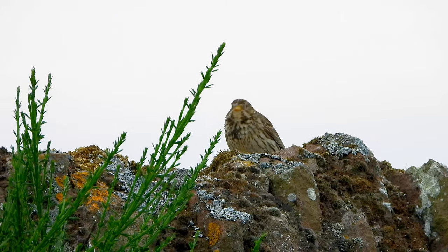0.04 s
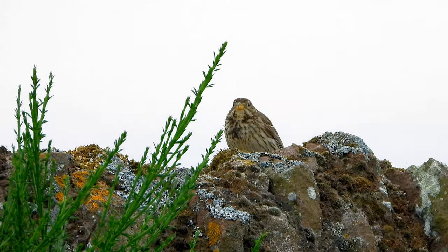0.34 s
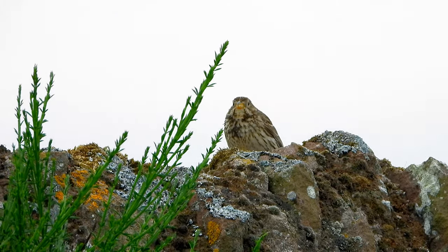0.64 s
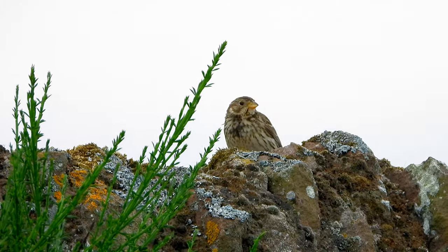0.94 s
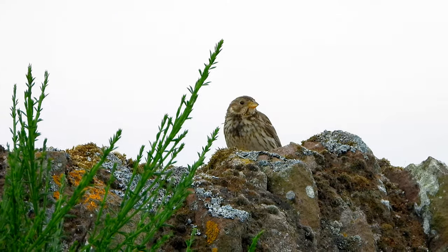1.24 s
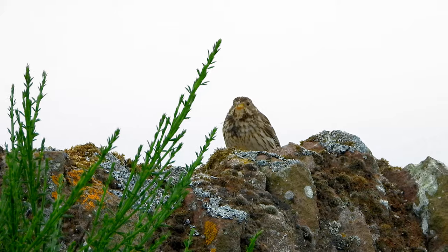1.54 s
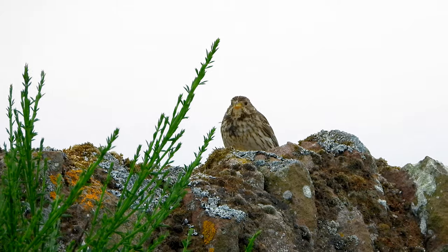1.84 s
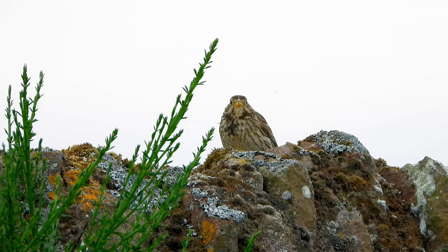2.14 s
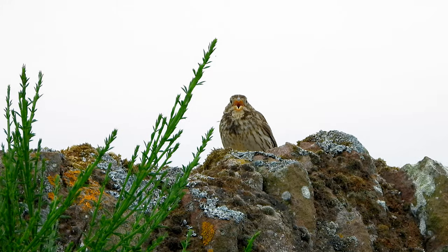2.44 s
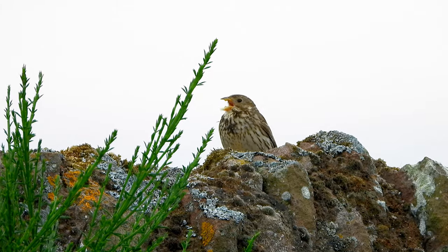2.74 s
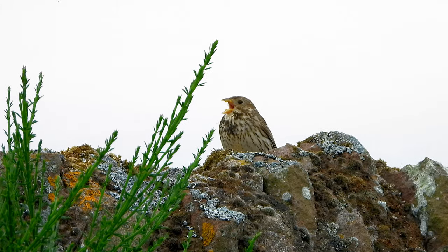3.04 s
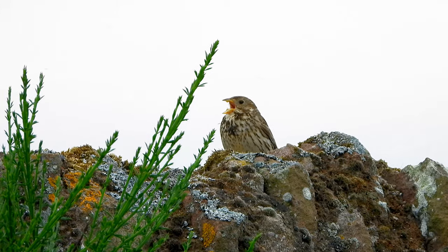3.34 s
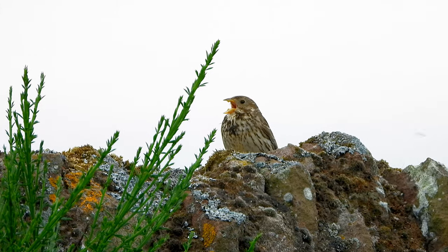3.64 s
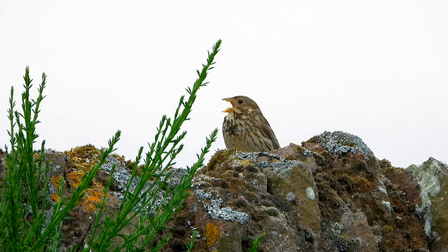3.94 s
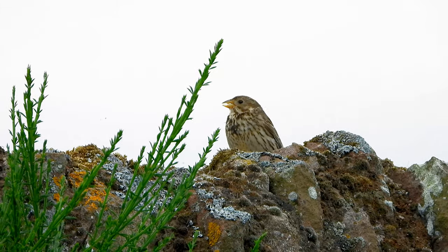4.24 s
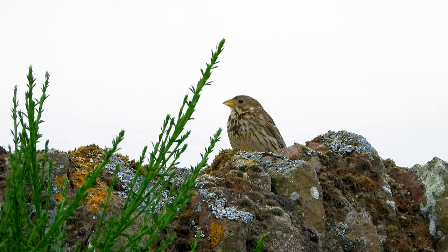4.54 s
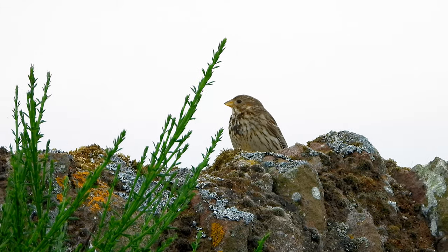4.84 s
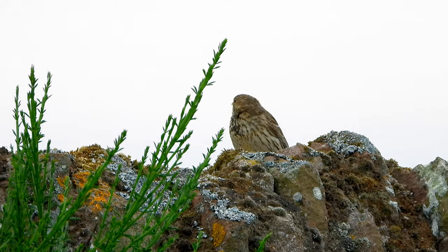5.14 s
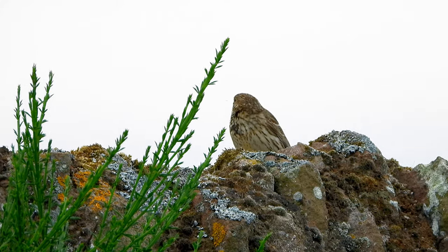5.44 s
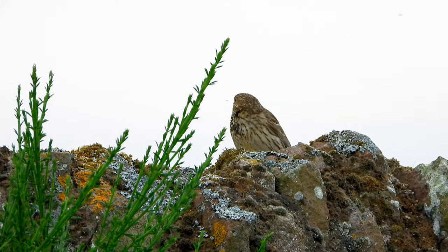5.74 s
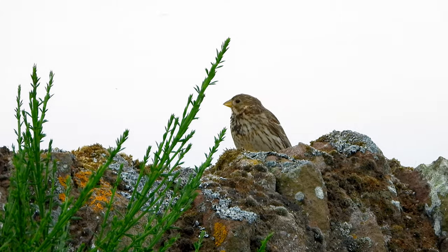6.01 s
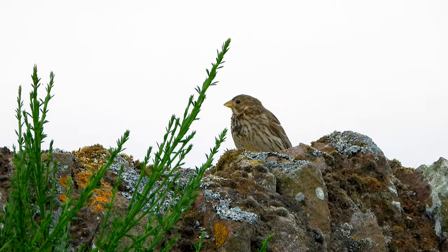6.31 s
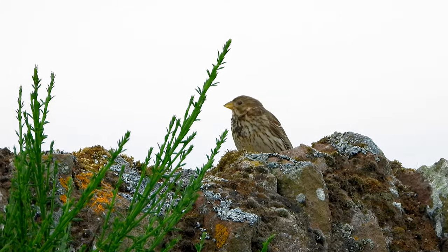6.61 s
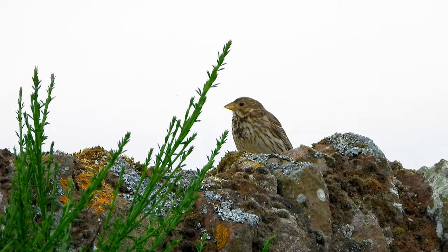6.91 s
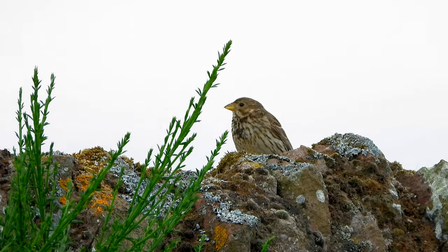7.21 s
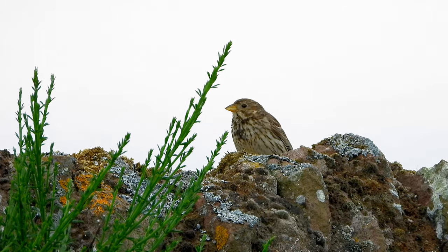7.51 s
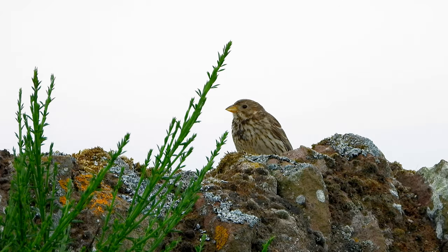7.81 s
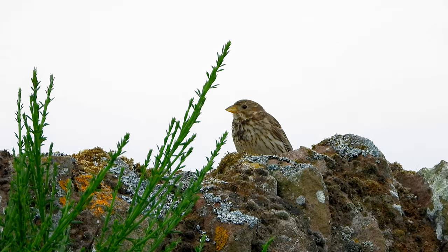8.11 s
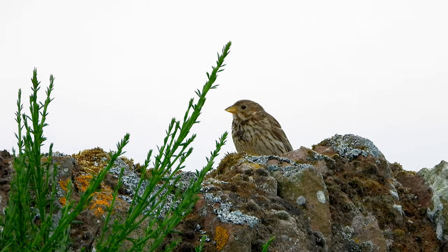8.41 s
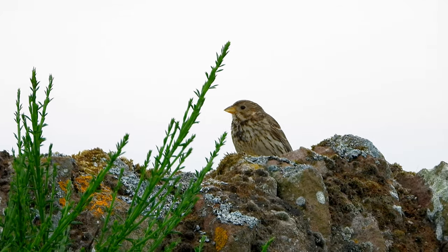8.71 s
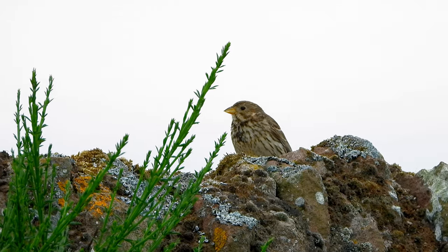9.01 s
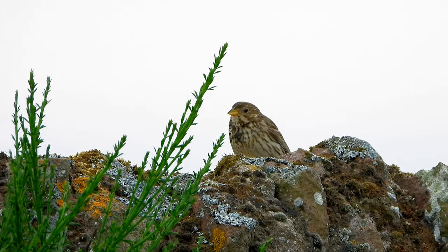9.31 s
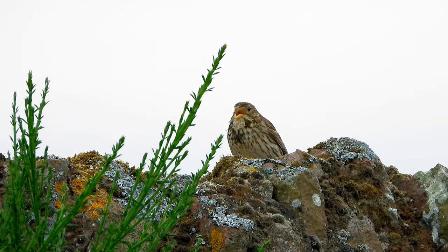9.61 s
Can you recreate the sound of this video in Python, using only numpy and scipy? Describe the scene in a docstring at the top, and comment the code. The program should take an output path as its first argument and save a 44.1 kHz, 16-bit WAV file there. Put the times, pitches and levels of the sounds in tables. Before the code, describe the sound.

A few climbing, buzzy whistles sound at middle distance in quiet countryside. Then a songbird perched near the microphone sings once: ticks first, then buzzes, then fast metallic rattles and trills that thin out. Other birds keep whistling and twittering farther off with a slight echo, over soft wind and occasional low puffs on the microphone. Two faint, dull knocks come late, and the near bird ticks again.

```python
"""Open fields, by a stone wall. A corn bunting close by sings one jangling strophe: ticks, buzzes, then a
rush of trills; a few more ticks follow later. The two sides of its syrinx are independent oscillators that
whistle at once and beat against each other. Other birds whistle and chatter farther off, the far ones
with more echo. The air murmurs, light gusts brush the microphone and two soft knocks sound."""
import sys
import numpy as np
from scipy import signal
from scipy.fft import rfft, irfft
from scipy.io import wavfile
from scipy.ndimage import uniform_filter1d

SR = 44100
rng = np.random.default_rng(int(sys.argv[2]) if len(sys.argv) > 2 else 0)


def to_wav(sig):
    """Store sig (one row per channel, or 1-D mono) as 16-bit WAV at the path in sys.argv[1].

    Samples outside -1..1 are clipped; the rate is SR.
    """
    pcm = np.clip(np.atleast_2d(sig), -1, 1) * 32767
    pcm = np.round(pcm).astype(np.int16)
    wavfile.write(sys.argv[1], SR, pcm.T)  # frames by channels


N = 434826
TIME = np.arange(N) / SR
FREQS = np.fft.rfftfreq(N, 1 / SR)

# The bunting's note shapes. Each: pitches in Hz from start to end, then the crest's place from 0 to 1.
CHIP, SQUEAK, DIP = (4300, 6600, 7100, 6900, .45), (970, 2260, 2570, 2500, 0.56), (8200, 7650, 7750, 7900, .3)
BUZZ_LOW, BUZZ_HIGH, HELD = (4330, 4510, 4590, 4530, .6), (7850, 8200, 8480, 8500, .25), (4150, 4420, 4620, 4600, .7)
FLICK, RATTLE_ARCH, ARCH = (4300, 6100, 7300, 8000, .48), (4750, 5100, 5560, 5300, .66), (4750, 5330, 5380, 4950, .52)
CHORD_LOW, CHORD_HIGH, SWELL = (5150, 5540, 5680, 5520, .2), (6150, 6950, 7330, 7480, .62), (5150, 5270, 5290, 5180, 0.56)
JANGLE_LOW, JANGLE_HIGH = (5550, 5570, 5430, 5150, .76), (8000, 7450, 7900, 7850, 7200, .25)
WARBLE_LOW, WARBLE_HIGH = (4550, 4480, 4720, 5100, .66), (6600, 5520, 5480, 5520, .72)
HOOK, DROP = (5480, 5700, 5520, 4750, .8), (8350, 7750, 7200, 5500, .72)
# The three notes of a tick. Each row: offset in seconds, length in seconds, four pitches in Hz, crest 0-1.
TICK_NOTES = [(-.048, 0.024, 5180, 4530, 4313, 4260, 0.46), (-.020, 0.0197, 2530, 3020, 3340, 3370, 0.39),
              (0, .024, 5450, 5700, 5150, 4830, .58)]
# Ticks. Each row: start of the main note in seconds, level in dB of each of the three notes.
TICKS = [(2.21, -55, -55, -32), (2.494, -34.5, -35.5, -19), (2.680, -28.5, -33.5, -17),
         (9.396, -67, -55, -32), (9.7, -36, -37.5, -20), (9.894, -33, -37, -12)]
# Opening syllables. Each entry: start in seconds.
OPENING_S = [2.777, 2.885, 2.9866, 3.0896]
# Single notes of three shapes. Each row: start and length in seconds, pitch in Hz, level in dB.
HELD_NOTES, HOOKS, DROPS = [(3.112, 0.06, 4490, -22.5), (3.169, 0.07, 4450, -25),
                            (3.229, 0.039, 4400, -35.5)], [(4.118, 0.027, 5580, -22), (4.16, 0.019, 5600, -19),
                                                (4.198, 0.022, 5660, -20), (4.249, 0.033, 4710, -26.5),
                                                (4.307, 0.03, 5460, -26.5)], [(4.155, 0.004, 6900, -22),
                                                               (4.1926, 0.0048, 7150, -27),
                                                               (4.369, 0.0091, 7500, -32),
                                                               (4.416, 0.01, 7420, -30),
                                                               (4.461, 0.012, 7200, -31),
                                                               (4.512, 0.013, 7310, -33.5)]
# Lone upward flicks. Each row: start in seconds, level in dB.
FLICKS = [(3.272, -21), (3.2933, -23), (3.388, -25)]
# Swelling rattles. Each row: start in seconds, repeats, period in seconds, first and last level in dB.
RATTLES = [(3.301, 6, .0085, -26, -18.5), (3.509, 4, .0082, -26, -15.5)]
# Arches that end the rattles. Each row: start in seconds, pitch in Hz, level in dB.
ARCHES = [(3.352, 5220, -16.5), (3.367, 5150, -19.5), (3.541, 5310, -16.5)]
# Two-voiced chords. Each row: start and length in seconds, lower voice's pitch in Hz and level in dB.
CHORDS = [(3.397, 0.033, 5620, -23.5), (3.554, 0.027, 5510, -23.5), (3.634, .028, 5440, -22.5)]
# Swells under a buzz. Each row: start and length in seconds, pitch in Hz, level in dB,
# then the buzz's first and last pitch in Hz and its level in dB.
SWELLS = [(3.466, 0.024, 5340, -21, 8100, 7600, -36), (3.616, 0.029, 5360, -19, 8200, 6400, -35.5),
          (3.692, 0.05, 5237, -16, 5840, 6500, -28.5), (3.856, 0.031, 5350, -17.5, 6400, 5750, -26.5)]
# Jangles. Each row: start in seconds, repeats, period in seconds, low pitch in Hz, first and last dB.
JANGLES = [(3.7755, 7, .0125, 5424, -26.5, -18), (3.92, 5, .0141, 5550, -26, -18)]
# Warbles. Each row: start in seconds, repeats, level in dB, delay of the upper voice in seconds.
WARBLES = [(3.9919, 6, -23, 0.018), (4.085, 3, -25, 0.003)]
# Responses of the throat, the combination tones and the rasp. Each row: frequency in Hz, gain in dB.
THROAT, COMBINATION_GAIN, RASP_SPECTRUM = [(2500, -40.5), (3400, -25), (4200, -0.5), (5000, -3.5),
                                           (7800, 2.5), (8800, -11.5), (11500, -16), (14000, -19)], [(500, -52.5), (900, -12), (1400, 9.5),
                                                           (3000, -2), (9500, -5), (10600, -17), (11700, 5),
                                                           (13100, 4.5), (14200, -10.5)], [(600, -28), (1500, 3.5),
                                                                          (7000, -9), (9500, 10),
                                                                          (11500, -1.5), (13300, -2.5),
                                                                          (14200, -16)]
# The bunting's stereo balance. Each row: frequency in Hz, pan in dB (always left minus right).
BUNTING_PAN = [(3000, 2.5), (4500, -2), (5200, 1), (6000, -2), (7500, 0), (10000, 0.5)]

# Climbing whistles at middle distance. Each row: start and length in seconds, first and last pitch in Hz,
# whistle level, buzz level and pan in dB.
RISERS = [(0.393, 0.24, 4070, 5760, -40, -43, -7.5), (0.911, 0.16, 4010, 5240, -43, -42, -3),
          (1.375, 0.221, 4140, 5490, -36.5, -37, -5.5)]
# Upstrokes of a trill at middle distance. Each row: start in seconds, pitch in Hz, level in dB.
TRILL_TICKS = [(5.918, 5400, -46), (5.9405, 5400, -42), (5.9595, 5030, -37.5), (5.978, 4850, -36.5),
               (5.9965, 4750, -36), (6.0152, 4570, -35), (6.034, 4530, -36), (6.0523, 4540, -34),
               (6.071, 4730, -35)]
# The trill's rising last note: start and length in seconds, four pitches in Hz, level in dB.
TRILL_END = (6.084, .038, 4700, 5280, 5430, 5620, -42.5)
# Far wheezes. Each row: start and length in seconds, first and last pitch in Hz, level in dB,
# flutter rate and depth in Hz, pan in dB.
FAR_WHEEZES = [ (0.202, 0.48, 4150, 3746, -53, 105.5, 80.5, 4.5),
               (1.099, 0.095, 6350, 5720, -51.5, 121, 490, -8.5),
               (1.788, 0.41, 3980, 3687, -50.5, 105.8, 75, 5.5),
               (3.038, 0.16, 3130, 2054, -55.5, 41.9, 200, 11),
               (3.384, 0.42, 4030, 3680, -46.5, 107.3, 170, 2),
               (3.68, 0.2, 2990, 3340, -48.5, 152, 223, 10), (4.58, 0.24, 4610, 4400, -52, 50, 150, -2.5),
               (4.889, 0.17, 4070, 3540, -45.5, 63.8, 157, 5.5),
               (5.286, 0.14, 3620, 3280, -52, 65.7, 39.7, 3), (5.803, 0.17, 3960, 3530, -47, 65.6, 150, 6),
               (6.973, 0.51, 4740, 3820, -49.5, 62.3, 151, -1),
               (8.552, 0.48, 4610, 3790, -49, 62.7, 150, -1)]
# Far whistles. Each row: start and length in seconds, first and last pitch in Hz, level and pan in dB.
FAR_WHISTLES = [ (0.168, 0.15, 3400, 2960, -58.5, -8), (0.448, 0.15, 3400, 2970, -58, -5),
                (0.831, 0.011, 3000, 2730, -51, -4), (0.875, 0.014, 2430, 2780, -51, 3),
                (0.894, 0.024, 3300, 3150, -44.5, 4), (0.936, 0.27, 3310, 3160, -57, 9),
                (1.098, 0.061, 3820, 3150, -47, 6), (1.192, 0.034, 5400, 4350, -35.5, -5),
                (1.269, 0.027, 5160, 4650, -44, 5), (1.283, .014, 3170, 3660, -53, 6),
                (1.307, .018, 3550, 4050, -53, 5), (1.283, 0.0847, 1732, 1570, -55, 5),
                (5.874, .24, 5050, 4060, -57, 0), (1.364, 0.017, 3860, 3480, -52, 3),
                (1.6, 0.16, 3385, 3190, -66, 8), (2.547, 0.023, 3240, 3270, -48, 21),
                (4.046, 0.023, 3360, 3130, -43, 6), (4.331, 0.041, 3150, 3520, -47, 4),
                (4.54, 0.034, 3920, 3420, -41, 4.5), (5.289, 0.089, 4850, 4340, -52.5, -2.5),
                (5.43, 0.032, 3990, 3530, -44.5, 6.5), (5.762, 0.023, 4760, 4250, -51, -2),
                (5.831, 0.0072, 5280, 4200, -38.5, -2), (5.841, 0.04, 4160, 3020, -43, 1),
                (6.207, 0.024, 4420, 3260, -41.5, -5), (6.41, 0.07, 4710, 4240, -51, 1.5),
                (8.29, 0.058, 4570, 4000, -56, 4), (9.471, 0.031, 3630, 3410, -45.5, 2),
                (7.084, 0.12, 3500, 3310, -57.5, 4), (7.637, 0.09, 3560, 3160, -55, 3),
                (7.982, 0.12, 3800, 3160, -55, -3), (9.194, 0.079, 4250, 3830, -46, -1),
                (9.721, 0.18, 2910, 2810, -58, 12)]
# Far arched whistles. Each row: start and length in seconds, level and pan in dB.
FAR_ARCHES = [(6.614, .26, -46, 7), (8.157, .255, -47, 7)]
# Contours of the far arches and chimes. Each entry: pitch in Hz, at even steps of time.
FAR_ARCH_HZ = (3170, 3490, 3370, 3230, 2880)
CHIME_HZ = (3956, 3554, 3660)
# Hoarse, very distant calls. Each row: start and length in seconds, three pitches in Hz, level in dB.
LOW_CALLS = [(0.331, 0.35, 1390, 1620, 1360, -57.5), (0.848, 0.53, 1760, 1780, 1560, -59),
             (4.28, .49, 1820, 1845, 1740, -63)]
# Far runs of pips. Each row: start in seconds, repeats, period in seconds, pitch in Hz,
# mean rise as a share of the pitch, level and pan in dB.
FAR_RUNS = [(4.29, 3, 0.019, 3440, 0.17, -39.5, 9), (4.715, 6, 0.014, 3370, -0.12, -42.5, 7),
            (5.21, 6, 0.015, 4500, -0.22, -45, -1), (5.59, 6, 0.018, 3490, -0.14, -43, 4),
            (6.075, 5, .031, 3100, -0.2, -53.5, 1), (6.155, 3, 0.019, 4350, -0.33, -37.5, -1),
            (7.374, 6, 0.019, 3090, -.2, -50.5, -4), (7.555, 4, 0.014, 2960, 0.24, -51.5, 7),
            (8.47, 7, 0.022, 3290, -0.27, -52.5, -7), (8.785, 5, 0.018, 3390, -0.19, -47.5, 4),
            (9.245, 4, 0.017, 3220, -0.23, -50.5, 0)]
# Far chiming series. Each row: start in seconds, repeats, level in dB.
FAR_CHIMES = [(6.251, 5, -44), (7.695, 7, -45.5)]

# Soft knocks near the microphone. Each row: start in seconds, peak level in dB.
KNOCKS = [(8.308, -37), (9.4, -34.5)]
# Gusts on the microphone. Each row: centre and half width in seconds, level in dB.
GUSTS = [(1.276, 0.081, -62.5), (1.464, 0.076, -43), (1.635, 0.086, -56.5), (3.441, 0.0084, -50),
         (3.667, 0.039, -61.5), (4.234, 0.011, -46.5), (4.375, 0.14, -58.5), (5.167, 0.016, -53.5),
         (5.587, 0.31, -58), (9.435, 0.013, -51)]
# Spectra of the gusts and of the murmuring air. Each row: frequency in Hz, relative level in dB.
GUST_SPECTRUM, AIR_SPECTRUM = [(25, -36), (100, -21), (160, 4), (210, 0.5), (300, -10), (1000, -32),
                               (8000, -80.5)], [(50, -43), (100, -20), (190, -6.5), (332, -3),
                                                    (556, -4.5), (859, -1), (1380, -7.5), (2000, -7),
                                                    (2350, -11.5), (4400, -16), (5300, -19.5), (6650, -26),
                                                    (8350, -38.5), (14000, -65)]
# Slow course of the murmur. Each row: time in seconds, level in dB.
AIR_LEVEL = [(0, -57.5), (2, -58.5), (4.2, -56.5), (5.8, -58), (7.6, -56.5), (8.6, -54), (9.86, -55.5)]
# Likeness of noise at the two ears. Each row: frequency in Hz, left-right correlation.
EAR_CORRELATION = [(100, 0.29), (280, 0.74), (600, 0.53), (1200, 0.61), (2500, 0.27)]


def bunting(left_lead_s=.000027, rasp_db=-31, coupling_db=-13):
    """Nonlinear coupling: the two voices modulate each other into sum and difference tones."""
    song = np.zeros((2, N))
    for phrase in (ticks, opening, rattles, chords, jangles, ending):
        for s, sound in phrase():
            add(song, s, sound)
    spectrum = rfft(song) + undb(coupling_db + at_pitch(COMBINATION_GAIN, FREQS)) * rfft(song ** 2)
    # a fine sizzle rides on the notes and bridges the gaps in the trills
    effort = uniform_filter1d(np.abs(np.diff(song[0], 2, prepend=[0, 0])), size=300)
    rasp = undb(rasp_db) * effort * noise(RASP_SPECTRUM)
    # the bird sits a little to the left, so that ear hears it first
    left_ear = undb(at_pitch(BUNTING_PAN, FREQS) / 2) * np.exp(1j * np.pi * FREQS * left_lead_s)
    return irfft(spectrum * np.array([left_ear, 1 / left_ear]), N) + rasp


def syrinx(length, pitches, crest, buzz_hz=0, depth_hz=0, choke_hz=800, octave_db=-24, close_s=0.0015):
    """One side of the syrinx as source and filter; a buzz modulates its frequency and amplitude."""
    hz, swell = gesture(length, pitches, crest, pointed=np.exp(-(length / .026) ** 2))
    n = len(hz)
    early = np.linspace(.5, -.5, n)  # the buzz slows and eases as it goes on
    cycle = turn(buzz_hz * (1 + 0.25 * early + .09 * walk(400, n)))
    swing = np.sin(cycle)
    sawtooth = swing - .3 * np.sin(2 * cycle)
    jitter = 0.0087 * (hz / 5000) * walk(880, n)  # higher notes are less steady
    phase = turn(hz * (1 + jitter) + depth_hz * sawtooth)
    pulse = np.exp((swing - 1) * (1 + early) * depth_hz / choke_hz)
    closing = np.tanh(TIME[:n][::-1] / close_s) ** 2
    # the throat passes whichever partial lies in its band: low notes sound mostly their octave
    first, second = undb(at_pitch(THROAT, hz)), undb(octave_db + at_pitch(THROAT, 2 * hz))
    tone = (first * np.sin(phase) + second * np.sin(2 * phase)) / np.hypot(first, second)
    return swell * pulse * closing * tone


def note(shape, length, db, hz=None, buzz_hz=0, depth_hz=0):
    """Transposition keeps frequency ratios: a note shape is scaled so that its middle lies at hz."""
    pitches = np.array(shape[:-1], float)
    if hz is not None:
        pitches = pitches * hz / np.mean(pitches[1:-1])
    return undb(db) * syrinx(length, pitches, shape[-1], buzz_hz, depth_hz)


def train(shape, s, repeats, period, length, first_db, last_db, hz=None, variation=.009):
    """Quasi-periodic repetition: the level ramps while pace, pitch and strength vary a little."""
    hz = np.mean(shape[1:-2]) if hz is None else hz
    for k, db in enumerate(np.linspace(first_db, last_db, repeats)):
        late, extra_db, detune = rng.standard_normal(3) * (.03, .8, variation)
        yield s + (k + late) * period, note(shape, length, db + extra_db, hz * (1 + detune))


def ticks():
    """Temporal grouping: three brief notes in close succession are heard as one tick."""
    for s, *levels in TICKS:
        for (offset, length, *shape), db in zip(TICK_NOTES, levels):
            yield s + offset, note(shape, length, db)


def opening(buzz_s=0.052, buzz_hz=500):
    """Fast modulation adds sidebands: chips lead into two-voiced buzzes, the last into a plain whistle."""
    for s in OPENING_S:
        yield s, note(CHIP, length=.005, db=-27.5)
        yield s + 0.0075, note(SQUEAK, length=.009, db=-36.5)
        yield s + 0.0194, note(DIP, length=.008, db=-34.5)
    for s in OPENING_S[:-1]:
        yield s + 0.019, note(BUZZ_LOW, buzz_s, db=-22, buzz_hz=buzz_hz, depth_hz=378)
        yield s + 0.019, note(BUZZ_HIGH, buzz_s, db=-45.5, buzz_hz=buzz_hz, depth_hz=400)
    for s, length, hz, db in HELD_NOTES:
        yield s, note(HELD, length, db, hz)


def rattles(flick_db=-8):
    """Pulse trains: after twin flicks, each cycle is a flick on one side and an arch on the other."""
    for s, db in FLICKS:
        yield s - .003, note(FLICK, length=0.0041, db=db - 8, hz=7300)
        yield s, note(FLICK, length=0.0048, db=db, hz=6600)
    for s, repeats, period, first_db, last_db in RATTLES:
        yield from train(FLICK, s, repeats + 1, period, 0.0071, first_db + flick_db, last_db + flick_db)
        yield from train(RATTLE_ARCH, s, repeats, period, 1.02 * period, first_db, last_db, hz=5230)
    for s, hz, db in ARCHES:
        yield s, note(ARCH, length=.0155, db=db, hz=hz)


def chords():
    """Superposition of both sides: two rising whistles beat, or a swell stutters in under a buzz."""
    for s, length, hz, db in CHORDS:
        yield s, note(CHORD_LOW, length, db, hz)
        yield s, note(CHORD_HIGH, length, db=-24)
    for s, length, hz, db, from_hz, to_hz, buzz_db in SWELLS:
        stutter = syrinx(0.015, (hz, hz), crest=.8, buzz_hz=320, depth_hz=200, choke_hz=129.3)
        yield s - 0.004, undb(db - 8) * stutter
        yield s, note(SWELL, length, db, hz)
        yield s, undb(buzz_db) * syrinx(length, (from_hz, to_hz), crest=0.67, buzz_hz=433, depth_hz=400)


def jangles(high_db=-30, warble_period_s=.0151):
    """Overlapping pulse trains from the two sides sound rough: first jangles, then lower warbles."""
    for s, repeats, period, hz, first_db, last_db in JANGLES:
        yield from train(JANGLE_HIGH, s - .001, repeats, period, 0.85 * period, high_db, high_db,
                         variation=0.029)
        yield from train(JANGLE_LOW, s, repeats, period, 0.96 * period, first_db, last_db, hz)
    for s, repeats, db, delay in WARBLES:
        yield from train(WARBLE_LOW, s, repeats, warble_period_s, .0135, db, db)
        yield from train(WARBLE_HIGH, s + delay, repeats - 1, warble_period_s, 0.013, db - 1.5, db - 1.5)


def ending():
    """Falling frequency sweeps close the song: hooks, the last led in by a squeak, and thin downstrokes."""
    for s, length, hz, db in HOOKS:
        yield s, note(HOOK, length, db, hz)
    yield HOOKS[-1][0] - 0.02, note(SQUEAK, length=0.024, db=-40, hz=3050)
    for s, length, hz, db in DROPS:
        yield s, note(DROP, length, db, hz)


def neighbours(tick_s=0.0061, tick_rise=0.23, trill_pan_db=-7.5, lag_s=.00007):
    """Rising frequency sweeps from birds at middle distance: slow ones whistle, brief ones tick."""
    out = np.zeros((2, N))
    for s, *call, pan_db in RISERS:
        add(out, s, riser(*call), pan_db, lag_s)
    for s, hz, db in TRILL_TICKS:
        upstroke = (hz * (1 - tick_rise / 2), hz * (1 + tick_rise / 2))
        pitch, swell = gesture(tick_s, upstroke, crest=0.45, rise=1.8, fall=1.4)
        add(out, s, undb(db) * swell * np.sin(turn(pitch)), trill_pan_db, lag_s)
    s, length, *pitches, db = TRILL_END
    add(out, s, undb(db) * far_note(length, pitches, shimmer_db=9), trill_pan_db, lag_s)
    return out


def riser(length, from_hz, to_hz, whistle_db, buzz_db, climb_at_s=0.092, climb_s=0.03, buzz_at_s=0.1,
          flutter_hz=128, stroke_hz=1900, attack_s=0.055, release_s=0.019):
    """Deepening modulation breaks a climbing whistle into a buzz of separate downstrokes."""
    t = TIME[:int(length * SR)]
    climb = .5 + .5 * np.tanh((t - climb_at_s) / climb_s / 2)
    buzz = .5 + .5 * np.tanh((t - buzz_at_s) / climb_s)
    cycle = np.cumsum(flutter_hz * (1 + .06 * walk(60, len(t)))) / SR % 1
    hz = (from_hz + (to_hz - from_hz) * climb) * (1 + 0.0092 * walk(830, len(t)))
    phase = turn(hz + stroke_hz * buzz ** 2 * np.exp(-cycle / .22))
    tone = np.sin(phase) + undb(-26) * (1 - buzz / 2) * np.sin(2 * phase)
    pulses = np.abs(np.sin(np.pi * cycle)) ** 3
    strength = undb(whistle_db) * (1 - climb) + undb(buzz_db) * buzz * pulses
    swell = np.minimum(t / attack_s, 1) * np.minimum((length - t) / release_s, 1)
    shimmer = undb(3 * walk(61, len(t)))
    return swell * shimmer * strength * tone


def far_birds(lag_s=.00007):
    """Differences of level and arrival time between the ears place the calls out in the fields."""
    out = np.zeros((2, N))
    for s, sound, pan_db in (*far_calls(), *far_series()):
        add(out, s, sound, pan_db, lag_s)
    return out


def far_note(length, pitches, depth_hz=0, flutter_hz=105, choke_hz=260, shimmer_db=2.5, jitter=0.0052,
             crest=0.91, edge_s=0.0012):
    """Scintillation: the level of a fluttering whistle shimmers on its way through moving air."""
    hz, swell = gesture(length, pitches, crest, rise=0.23, fall=0.33)
    n = len(hz)
    cycle = turn(flutter_hz * (1 + .03 * walk(40, n)))
    phase = turn(hz * (1 + jitter * walk(200, n)) + depth_hz * np.sin(cycle))
    pulse = np.exp(-np.cos(cycle) * min(depth_hz / choke_hz, 1))  # loudest on each downswing
    pulse /= np.sqrt(np.mean(pulse ** 2))
    octave = undb(-36 + at_pitch(THROAT, hz)) * (hz < 5600)
    tone = np.sin(phase) + octave * np.sin(2 * phase)
    edge = np.minimum(np.minimum(TIME[:n], TIME[:n][::-1]) / edge_s, 1)
    shimmer = undb(shimmer_db * walk(59.8, n))
    return edge * swell * pulse * shimmer * tone


def far_calls(low_pan_db=6):
    """Modulation sets the timbre: fluttering calls are wheezy or hoarse, smooth glides are clear."""
    for s, length, from_hz, to_hz, db, flutter_hz, depth_hz, pan_db in FAR_WHEEZES:
        pitches = glide(from_hz, to_hz, shares=(.68, .87))
        yield s, undb(db) * far_note(length, pitches, depth_hz, flutter_hz, choke_hz=191, crest=.95), pan_db
    for s, length, from_hz, to_hz, db, pan_db in FAR_WHISTLES:
        yield s, undb(db) * far_note(length, glide(from_hz, to_hz, shares=(.34,))), pan_db
    for s, length, db, pan_db in FAR_ARCHES:
        yield s, undb(db) * far_note(length, FAR_ARCH_HZ), pan_db
    for s, length, *pitches, db in LOW_CALLS:
        call = far_note(length, pitches, depth_hz=170, flutter_hz=175, choke_hz=600, shimmer_db=3,
                        jitter=0.014)
        yield s, undb(db) * call, low_pan_db


def far_series(pip_share=0.453, chime_period_s=.049, chime_s=0.027, chime_pan_db=6, upper_hz=(4750, 4500)):
    """Repetition rate sets the texture: quick pips rattle, slower notes chime between two pitches."""
    for s, repeats, period, hz, rise, db, pan_db in FAR_RUNS:
        for k in range(repeats):
            tuning, slant = 1 + rng.standard_normal(2) * (.035, .5)
            stroke = hz * tuning * (1 + rise * slant * np.array([-.5, .5]))
            yield s + k * period, undb(db) * far_note(pip_share * period, stroke, shimmer_db=3), pan_db
    for s, repeats, db in FAR_CHIMES:
        for start in s + np.arange(repeats) * chime_period_s:
            yield start, undb(db) * far_note(chime_s, CHIME_HZ, shimmer_db=1.5), chime_pan_db
            yield start - chime_s, undb(db - 10) * far_note(chime_s, upper_hz), chime_pan_db


def far_chatter(count=230, slur_hz=3850, slur_db=-63.5, slur_s=.15, warble_hz=45,
                tick_hz=3550, tick_db=-58, tick_s=0.008, period_s=0.022, lag_s=.00007):
    """Incoherent summation: random slurs and rattles from all around merge into lark-like chatter."""
    out = np.zeros((2, N))
    starts = (np.arange(count) + rng.random(count)) / count * N / SR
    for s, (pitch, span, slope, size, side, reach) in zip(starts, rng.uniform(-1.7, 1.7, (count, 6))):
        slide = -0.1 + 0.11 * slope
        contour = slur_hz * np.exp(0.14 * pitch + np.array([-slide / 2, 0.035 * reach, slide / 2]))
        slur = far_note(slur_s * 2 ** (span / 2), contour, warble_hz * abs(reach), shimmer_db=3,
                        jitter=0.005)
        add(out, s, undb(slur_db + size) * slur, 2 * side, lag_s * (1 + side))
        for k, (late, loud, high) in enumerate(rng.uniform(-2.2, 2, (round(4 + span), 3))):
            stroke = tick_hz * np.exp(0.16 * reach + .04 * high + np.array([-slide, slide]) / 2)
            tick = undb(tick_db - size + loud) * far_note(tick_s * 2 ** (pitch / 2), stroke)
            start = s + (k + late / 10) * period_s * 2 ** (side / 2)
            add(out, start, tick, 1 - side, lag_s * (1 - side))
    return out


def knocks(ring_hz=1080, t60=0.0097, attack_s=0.00086):
    """A heavily damped resonance: each dull tap rings for only a few cycles."""
    out, t = np.zeros((2, N)), TIME[:SR // 20]
    envelope = undb(-60 * t / t60) * np.minimum(t / attack_s, 1) ** 2
    ring = envelope * np.sin(2 * np.pi * ring_hz * t)
    for s, db in KNOCKS:
        add(out, s, undb(db) * ring / np.abs(ring).max())
    return out


def wind(buffet_db=6, waver_db=1.66):
    """Turbulent pressure buffets the microphone at low frequencies, over the even murmur of the land."""
    force = sum(undb(db) * np.exp(-((TIME - s) / width) ** 2) for s, width, db in GUSTS)
    buffets = np.array([walk(35, N) for _ in range(2)])
    gusts = noise(GUST_SPECTRUM) * force * undb(buffet_db * buffets)
    air_db = np.interp(TIME, *np.transpose(AIR_LEVEL))
    murmur = noise(AIR_SPECTRUM) * undb(air_db + waver_db * walk(11, N))
    return gusts + murmur


def scatter(x, t60):
    """Diffuse reflection from stones, shrubs and ground: a decaying echo, different at each ear."""
    t = TIME[:SR // 2]
    tail = rng.standard_normal((2, len(t))) * undb(-60 * t / t60) * np.minimum(t / 0.0029, 1)
    return signal.fftconvolve(x, tail / np.sqrt(np.sum(tail ** 2) / 2), axes=1)[:, :N]


def gesture(length, pitches, crest, rise=1.17, fall=0.42, pointed=0):
    """A note's frequency and envelope: a smooth glide under a swell that peaks at the crest."""
    progress = np.linspace(0, 1, max(int(length * SR), 16))
    curve = np.polyfit(np.linspace(0, 1, len(pitches)), pitches, len(pitches) - 1)
    ramp = np.interp(progress, [0, crest, 1], [0, 1, 0])
    arch = pointed * ramp + (1 - pointed) * np.sin(np.pi / 2 * ramp)
    return np.polyval(curve, progress), arch ** np.where(progress < crest, rise, fall)


def glide(from_hz, to_hz, shares):
    """Pitches of a sweep that has covered the given shares of its way at even steps of time."""
    return from_hz + np.array([0, *shares, 1]) * (to_hz - from_hz)


def noise(spectrum):
    """Partially coherent noise of rms 1: the two channels are most alike in the low middle."""
    mid, side = rfft(rng.standard_normal((2, N)))
    correlation = at_pitch(EAR_CORRELATION, FREQS)
    mid, side = mid * np.sqrt(1 + correlation), side * np.sqrt(1 - correlation)
    x = irfft(np.array([mid + side, mid - side]) * undb(at_pitch(spectrum, FREQS)), N)
    return x / x.std()


def walk(rate_hz, size):
    """Low-pass random fluctuation with a spread near 1."""
    hold = max(int(SR / rate_hz), 2)
    steps = np.repeat(rng.standard_normal(size // hold + 2), hold)
    return uniform_filter1d(steps, hold)[:size]


def add(out, s, sound, pan_db=0, lag_s=0):
    """Binaural placement: mix a sound in from time s, with a level difference and a right-ear delay."""
    for channel, (start, db) in enumerate([(s, pan_db / 2), (s + lag_s, -pan_db / 2)]):
        i = max(int(start * SR), 0)
        part = sound[:max(N - i, 0)]
        out[channel, i:i + len(part)] += undb(db) * part


def turn(hz):
    """Phase is the running integral of frequency."""
    return 2 * np.pi * np.cumsum(hz) / SR


def at_pitch(points, hz):
    """Interpolation of (Hz, value) points on a log-frequency axis."""
    f, value = np.transpose(points)
    return np.interp(np.log(np.maximum(hz, 1)), np.log(f), value)


def undb(db):
    """Amplitude ratio of a level in decibels."""
    return 10 ** (np.asarray(db) / 20)


def scene():
    """Reflection cues distance: bunting and neighbours are almost dry; far calls and chatter echo more."""
    near, middle, far, chatter = bunting(), neighbours(), far_birds(), far_chatter()
    near_echo = undb(-16.5) * scatter(near, t60=0.17)
    far_echo = undb(-10) * scatter(undb(-7) * middle + far + undb(6) * chatter, t60=0.28)
    return near + near_echo + middle + far + chatter + far_echo + knocks() + wind()


def record(dry, cutoff_hz=14200):
    """Band limiting: the recorder's steep low-pass filter removes the highest treble."""
    return signal.sosfilt(signal.ellip(8, .2, 70, cutoff_hz, fs=SR, output="sos"), dry)


dry = scene()
out = record(dry)
to_wav(out)
```